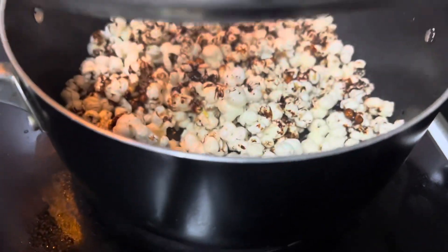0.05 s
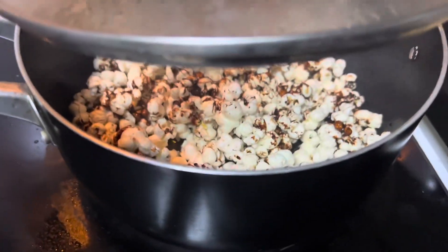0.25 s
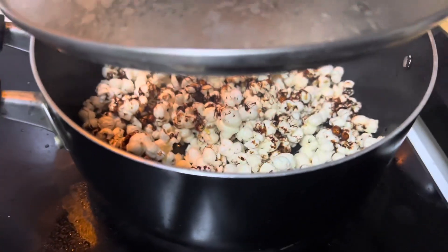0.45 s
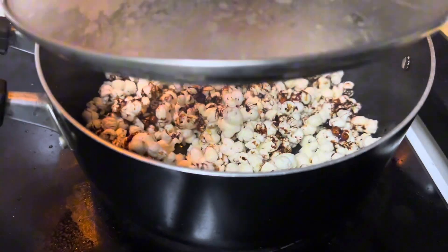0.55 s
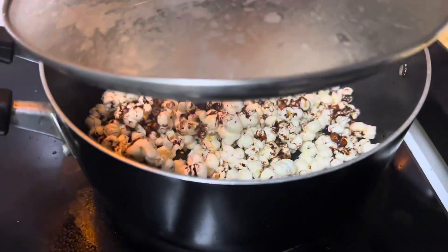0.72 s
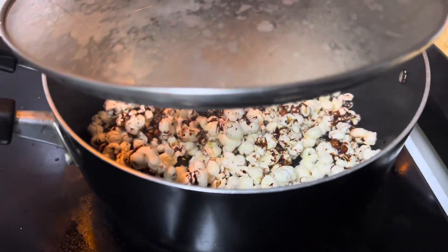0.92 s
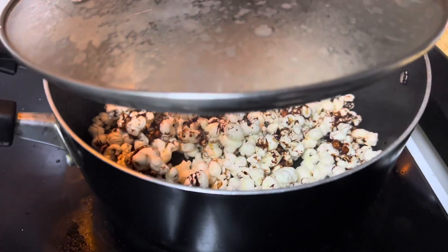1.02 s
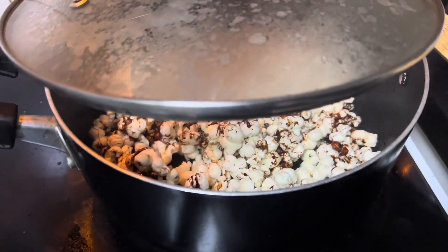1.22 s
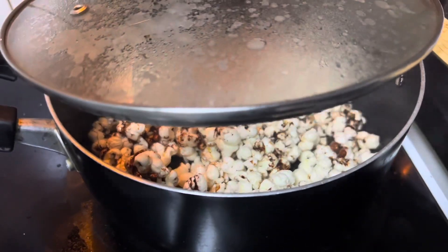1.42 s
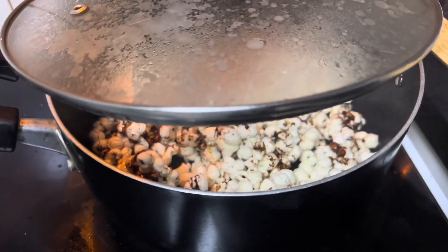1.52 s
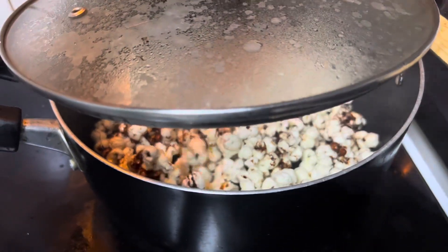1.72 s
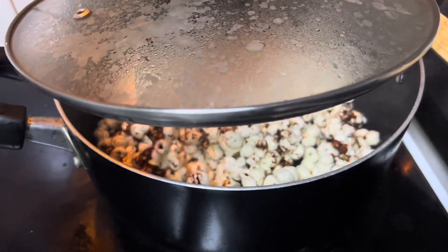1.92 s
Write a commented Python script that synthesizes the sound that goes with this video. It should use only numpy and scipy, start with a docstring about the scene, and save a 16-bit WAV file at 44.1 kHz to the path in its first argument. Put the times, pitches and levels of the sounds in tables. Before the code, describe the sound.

Popcorn kernels crack and knock in a metal pot over softly sizzling oil, close up

```python
"""Popcorn pops in a metal pot whose lid is held ajar, close by in a small kitchen.
Each bursting or flying kernel gives a crack and a spit of steam, made of short puffs of shaped noise.
It also knocks the pot's base and rings its wall and lid, made of fading sine waves.
Oil sizzles softly underneath as noise with tiny ticks, over a low room rumble of steady noise.
The kitchen answers every pop with a fading tail of noise; heavy knocks add a short boom of the hob."""
import sys
import numpy as np
from scipy import signal
from scipy.fft import rfft, irfft, next_fast_len
from scipy.io import wavfile

SR = 44100
rng = np.random.default_rng(int(sys.argv[2]) if len(sys.argv) > 2 else 0)


def store_wav(level_fs):
    """Save 16-bit WAV to argv[1]."""
    pcm = np.round(np.clip(np.atleast_2d(level_fs), -1, 1) * 32767)
    wavfile.write(sys.argv[1], SR, pcm.T.astype(np.int16))


N = 85995
AGE = np.arange(SR // 2) / SR  # seconds since a sound began

# how alike a burst is on the left and right: (frequency [Hz], likeness [0 to 1])
BURST_ALIKE = [(300, .9), (1200, 0), (3000, 0.54), (6000, 0.14), (12000, 0)]
# colour of spitting steam, also used for the oil's ticks: (frequency [Hz], relative level [dB])
SPIT_COLOUR = [(2000, -38), (6000, 2.5), (8500, 2.5), (10300, -9), (12300, 7), (14000, -17), (15500, 6),
               (17000, -63)]


def amp(db):
    """Turn decibels into a gain."""
    return 10 ** (np.asarray(db) / 20)


def unit(x, size=None):
    """Scale a sound so that its first size samples (or all of it) have an rms of 1."""
    return x / np.sqrt(np.mean(x[..., :size] ** 2) + 1e-20)


def along(points, hz):
    """Read a curve of (frequency, value) points, joined by straight lines on a log frequency axis."""
    f, v = np.transpose(points)
    return np.interp(np.log(hz + 1), np.log(f + 1), v)


def filtered(x, response):
    """Make each frequency of x louder or softer by the gain that response gives for it."""
    n = x.shape[-1]
    padded = next_fast_len(n + 8192)  # spare room keeps the end from wrapping onto the start
    gain = response(np.fft.rfftfreq(padded, 1 / SR))
    return irfft(rfft(x, padded) * gain, padded)[..., :n]


def noise(colour, alike, size):
    """Coloured stereo noise of rms 1: a shared part, plus a part that is opposite on the two sides."""
    def mid_and_side_gains(hz):
        turn = np.arccos(np.clip(along(alike, hz), -1, 1)) / 2
        return amp(along(colour, hz)) * [np.cos(turn), np.sin(turn)]

    mid, side = filtered(rng.standard_normal((2, size)), mid_and_side_gains)
    return unit(np.array([mid + side, mid - side]))


def fade(t60):
    """A smooth dying away that falls by 60 dB in t60 seconds."""
    return np.exp(-np.log(1000) * AGE / t60)


def add(out, s, x):
    """Mix x into out, starting at s seconds."""
    start = max(0, round(s * SR))
    out[:, start:start + x.shape[-1]] += x[..., :max(0, N - start)]


def rumble():
    """The steady low noise of the kitchen, nearly the same on both sides in the deep bass."""
    # (frequency [Hz], relative level [dB])
    rumble_colour = [(22, -38), (36, -3), (52, -0.5), (110, -6), (200, -11), (300, -13), (375, -13.5),
                     (455, -10), (560, -28.5), (900, -16), (1500, -62)]
    level_db = -49
    return amp(level_db) * noise(rumble_colour, [(100, 0.99), (300, 0.32), (900, 0.19)], size=N)


def kitchen(x):
    """Hard walls return a diffuse tail of x; each frequency dies at its own speed."""
    # how long the echo lasts: (frequency [Hz], time to fall 60 dB [s])
    room_t60 = [(200, 1.04), (550, 0.2645), (1400, .5), (3700, 0.4378), (7000, 0.53), (14000, 0.08)]
    # colour of the echo: (frequency [Hz], relative level [dB])
    room_colour = [(100, -15.5), (450, -11.5), (700, 1.5), (1400, -6.5), (3000, -1), (6000, -4.5),
                   (9000, -5.5), (15000, -10.5)]
    onset_s = 0.0021
    # cut noise into short slices and bands, so that every band can fade by itself
    hz, t, bands = signal.stft(rng.standard_normal((2, SR // 2)), SR, nperseg=256)
    t60 = along(room_t60, hz)[:, None]
    faded = bands * np.exp(-np.log(1000) * t / t60)
    tail = signal.istft(faded, SR)[1][:, :len(AGE)]
    tail = tail * (1 - np.exp(-(AGE / onset_s) ** 2))
    tail = tail / np.linalg.norm(tail[0])
    tail = filtered(tail, lambda f: amp(along(room_colour, f)))
    return signal.fftconvolve(x, tail, axes=1)[:, :N]


def sizzle():
    """Hot oil: a soft steady hiss, with tiny noise ticks at random moments."""
    # (frequency [Hz], relative level [dB])
    oil_colour = [(350, -37), (600, 2.5), (1350, -3), (2570, -6), (6400, -5), (8500, -8), (10300, -26),
                  (12200, -2), (14000, -16.5), (16000, -11.5)]
    hiss_db, ticks_db = -48.5, -63
    ticks_per_s, tick_t60, tick_spread_db = 120, 0.005, 2  # average rate, fading time in s, loudness spread
    hiss = noise(oil_colour, [(600, 0.0), (2000, 0.0), (10000, 0.15)], size=N)
    moments = rng.random(N) < ticks_per_s / SR
    loudness_db = tick_spread_db * np.clip(rng.standard_normal((2, N)), -2, 2)
    one_tick = noise(SPIT_COLOUR, BURST_ALIKE, size=len(AGE)) * fade(tick_t60)
    ticks = signal.fftconvolve(moments * amp(loudness_db), one_tick, axes=1)[:, :N]
    return amp(hiss_db) * hiss + amp(ticks_db) * unit(ticks)


def hob():
    """The hob booms briefly under the heavier knocks: one low fading sine wave for each."""
    # (time [s], pitch [Hz], level before the attack and fade shape it [dB])
    shakes = [(.236, 108, -33), (.511, 145, -33), (.529, 75, -27.5), (1.384, 160, -48), (1.601, 117, -39)]
    t60, attack_s = 0.18, 0.0016
    out = np.zeros((2, N))
    envelope = fade(t60) * (1 - np.exp(-AGE / attack_s))
    for s, hz, db in shakes:
        add(out, s, amp(db) * envelope * np.sin(2 * np.pi * hz * AGE))
    return out


def leaks():
    """Steam leaking from a splitting hull: a thin noise hiss that swells, then stops at once."""
    # (end time [s], length [s], level reached at the end [dB])
    steam_leaks = [(0.2273, 0.017, -17)]
    # (frequency [Hz], relative level [dB])
    leak_colour = [(2500, -21), (4200, -7), (5300, -38), (6400, 5.5), (7800, -27), (12000, -40)]
    out = np.zeros((2, N))
    for end, length, db in steam_leaks:
        size = int(length * SR)
        swell = amp(db + np.linspace(-28, 0, size))
        add(out, end - length, swell * noise(leak_colour, BURST_ALIKE, size=size))
    return out


def burst(colour, attack_s, t60, hz=1000, peak_db=0):
    """A fast puff of noise, perhaps loudest around hz, that rattles on briefly between pot and lid."""
    rattle_db, rattle_t60 = -24.5, 0.091
    width_oct = 0.16  # how far the loud region reaches around hz, in octaves
    envelope = (1 - np.exp(-(AGE / attack_s) ** 2)) * (fade(t60) + amp(rattle_db) * fade(rattle_t60))

    def resonance(f):
        octaves_away = np.log2((f + 1) / hz)
        return amp(peak_db * np.exp(-(octaves_away / width_oct) ** 2))

    puff = filtered(noise(colour, BURST_ALIKE, size=len(AGE)), resonance)
    return unit(puff * envelope, size=int(0.005 * SR))  # rms 1 over the first 5 ms


def ring(modes, attack_s, spread):
    """Metal ringing: fading sine waves, struck differently each time; spread drifts the sides' phases apart."""
    scatter_db = 3  # random change in the loudness of each mode
    out = 0
    for hz, db, t60 in modes:
        phase = spread * rng.standard_normal((2, 1))
        gain = amp(db + scatter_db * rng.standard_normal())
        out = out + gain * fade(t60) * np.sin(2 * np.pi * hz * AGE + phase)
    return out * (1 - np.exp(-AGE / attack_s))


def kernels():
    """Every kernel that bursts or hits the pot thuds on the base, rings the lid, clacks, cracks and spits."""
    # (time [s], base thud [dB], lid ring before lid_trim_db [dB], wall clack [dB], hull crack [dB],
    #  hull pitch [Hz], steam spit [dB], left louder than right by [dB])
    pops = [(0.2237, -37, -28, -33, -14, 3160, -27.5, 1.2),
            (.2242, -54, -47, -35, -19.5, 6300, -24.5, -4.5),
            (0.2362, -36.5, -31, -28.5, -20, 2920, -30, 5.5),
            (0.2632, -35.5, -27.5, -30, -24.5, 2840, -51, 0), (.299, -40, -52, -28, -22.5, 3370, -30, -4.5),
            (0.3099, -26, -19, -23, -23, 2820, -21, 3), (0.3189, -73, -40, -32, -26, 4870, -30, -3),
            (.36, -45, -37, -33.5, -32.5, 6640, -32.5, 1), (.374, -61, -52, -49, -52, 6500, -37.5, -4),
            (.508, -23, -48, -55, -37, 2900, -62, 1.5), (.527, -24.5, -24, -27, -37.5, 2680, -32.5, 5.5),
            (.534, -30.5, -29.5, -55, -35.5, 6260, -44, -5), (.555, -38, -44, -38.5, -37, 4280, -43, -1.5),
            (.58, -45, -36.5, -46, -40.5, 4400, -43, -3), (.697, -77, -59, -58, -47.5, 6000, -45, -5),
            (0.9207, -32, -38, -46, -39, 6000, -33, 1.5), (.926, -48.5, -52, -39.5, -32.5, 6260, -33, -1.5),
            (.935, -47, -56, -44, -40, 4270, -54, 6), (1.2392, -80, -70, -61, -74, 6060, -53, 14),
            (1.3823, -29, -40, -22, -17, 5700, -26, 0.5), (1.395, -69, -62, -43, -29, 5900, -25, 0),
            (1.48, -72, -53, -75, -58, 6000, -44, 4), (1.5907, -28.5, -29, -16.5, -13.5, 3600, -27.5, 0.4),
            (1.6003, -39, -22, -20, -16, 3960, -20.5, -0.5), (1.637, -48, -43, -43, -41, 5300, -32, 0),
            (1.6691, -28, -29.5, -25, -21.5, 2600, -29.5, 1.5),
            (1.686, -39, -41, -52, -29, 8200, -27.5, -2.5), (1.942, -71, -61, -50, -41.5, 6160, -39.5, 10)]
    # ways each part rings: (frequency [Hz], relative level before random scatter [dB], time to fall 60 dB [s])
    base_modes = [(147.7, -13.5, 0.064), (226.4, -3, .02), (263.3, -16.5, 0.076), (302, -15, 0.096),
                  (387.4, -2, 0.028), (443.7, -1, 0.034), (459.8, -9.5, 0.11)]
    wall_modes = [(462.5, -22.5, 0.2), (1458, -18, .18), (1537, -4.5, 0.12), (1576, -29, 0.15),
                  (1738, -26, 0.088), (2640, -15, 0.13), (2720, -8, 0.1), (2895, -29, 0.19),
                  (3240, -16, 0.11), (3680, -33, 0.44), (4200, -22, 0.34)]
    lid_modes = [(1098, -13, .38), (1110, -5, .05), (1145, -12, .16), (1160, 0, .022)]  # a close cluster
    # colours of the puffs: (frequency [Hz], relative level [dB])
    clack_colour = [(300, -20.5), (600, -17), (880, -15.5), (1300, -16), (1520, 4), (1700, -2.5),
                    (1820, -6.5), (2000, -6), (2300, -15), (3000, -17.5), (7000, -38)]
    crack_colour = [(500, -29.5), (1500, -18), (2150, -6), (2800, 0), (3900, 0), (4900, -3), (6200, 0.5),
                    (7300, -17), (10000, -27), (16000, -32)]
    lid_trim_db, wall_ring_db = -5, -4.5
    out = np.zeros((2, N))
    for s, thud_db, lid_db, clack_db, crack_db, hull_hz, spit_db, pan_db in pops:
        thud = unit(ring(base_modes, attack_s=0.0032, spread=0.35), size=int(0.01 * SR))
        lid = unit(ring(lid_modes, attack_s=0.00057, spread=0.9), size=int(0.005 * SR))
        clack = burst(clack_colour, attack_s=0.0015, t60=0.034)
        wall = clack + amp(wall_ring_db) * ring(wall_modes, attack_s=0.0028, spread=1.0)
        metal = amp(thud_db) * thud + amp(lid_db + lid_trim_db) * lid + amp(clack_db) * wall
        # each hull cracks loudest around a pitch of its own
        crack = burst(crack_colour, attack_s=0.0013, t60=0.016, hz=hull_hz, peak_db=6)
        spit = burst(SPIT_COLOUR, attack_s=0.00078, t60=0.017)
        hull = amp(crack_db) * crack + amp(spit_db) * spit
        left_right = amp([[pan_db / 2], [-pan_db / 2]])
        add(out, s, (metal + hull) * left_right)
    return out


def scene():
    """The pot and its echo, the hob's booms and the steady background."""
    echo_db = -3.5
    pot = kernels() + leaks()
    return rumble() + sizzle() + hob() + pot + amp(echo_db) * kitchen(pot)


def record(dry):
    """The recorder rounds off the highest peaks, thins the deepest bass and drops the topmost treble."""
    low_cut_hz, top_hz = 42, 16400
    limited = dry / (1 + np.abs(dry) ** 6) ** (1 / 6)
    low_cut = signal.butter(2, low_cut_hz, "highpass", fs=SR, output="sos")
    thinned = signal.sosfilt(low_cut, limited)
    return filtered(thinned, lambda hz: hz < top_hz)


dry = scene()
out = record(dry)
store_wav(out)
```